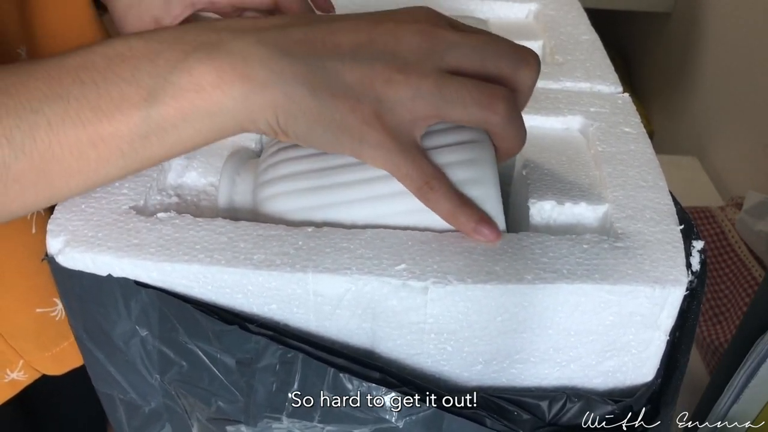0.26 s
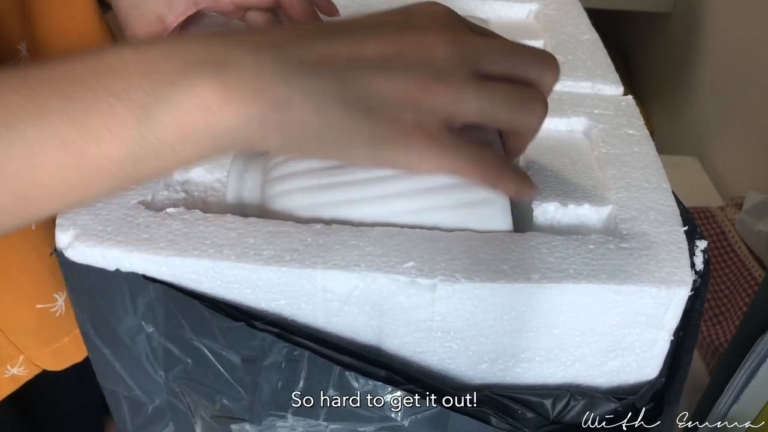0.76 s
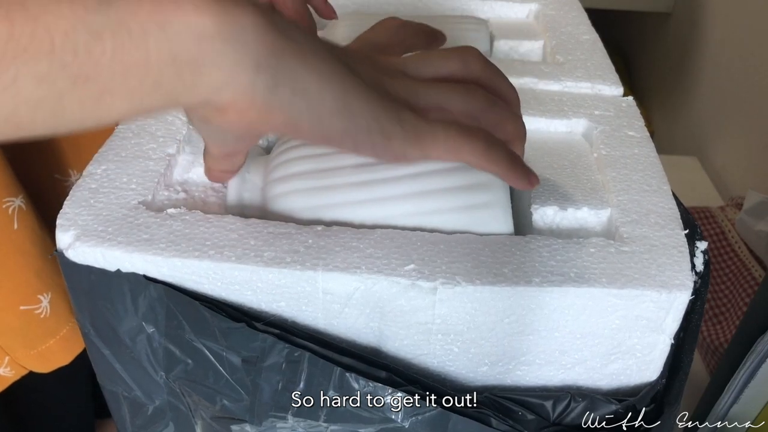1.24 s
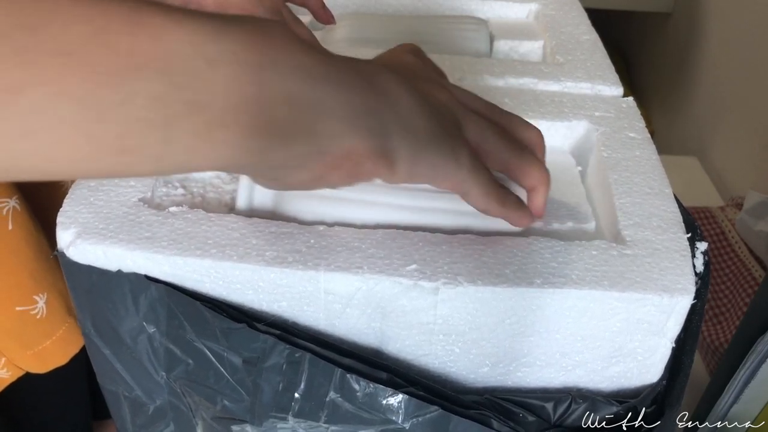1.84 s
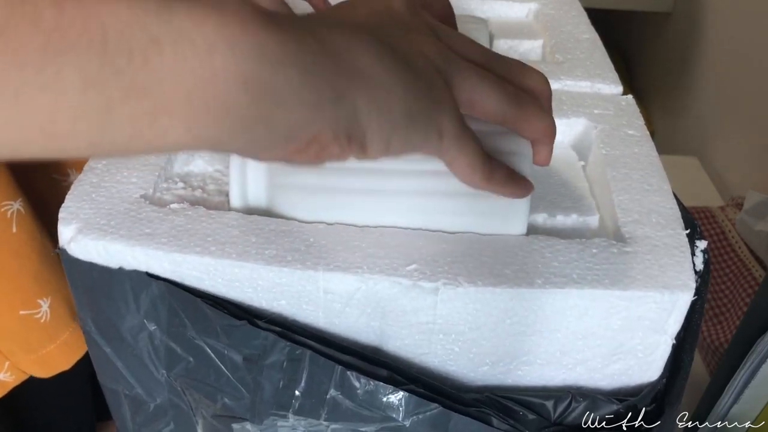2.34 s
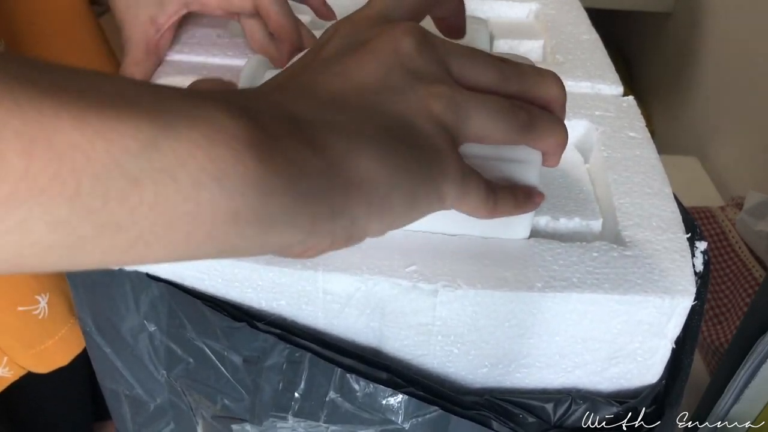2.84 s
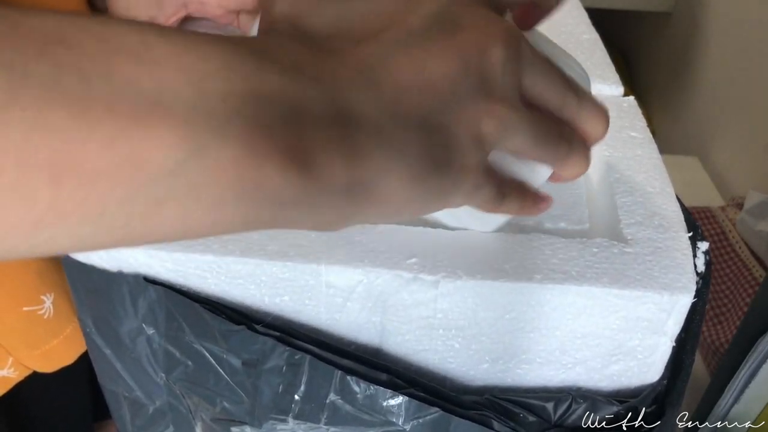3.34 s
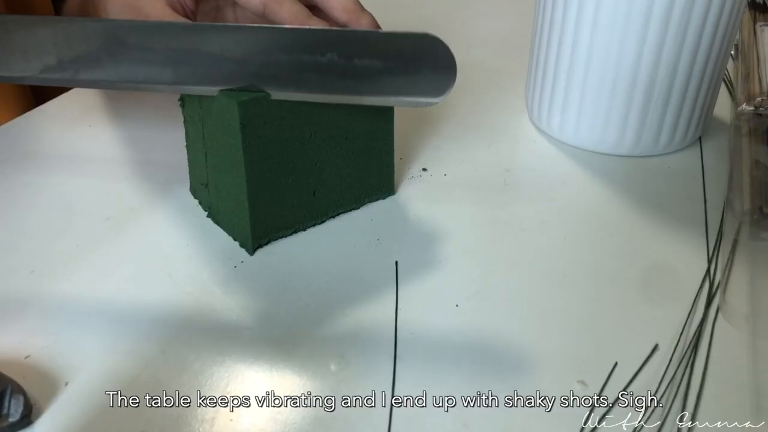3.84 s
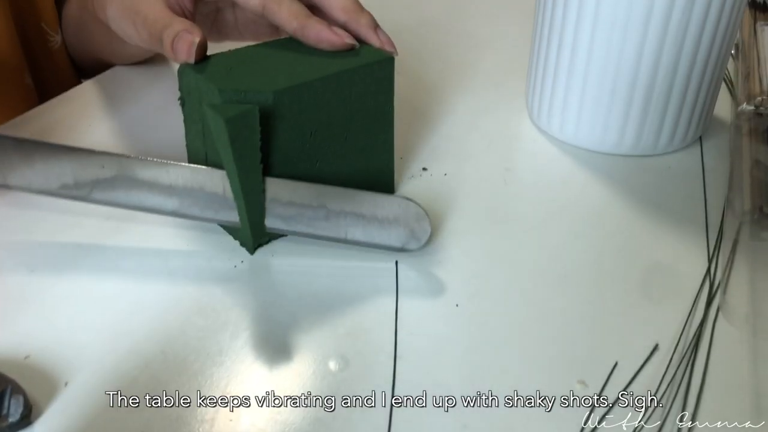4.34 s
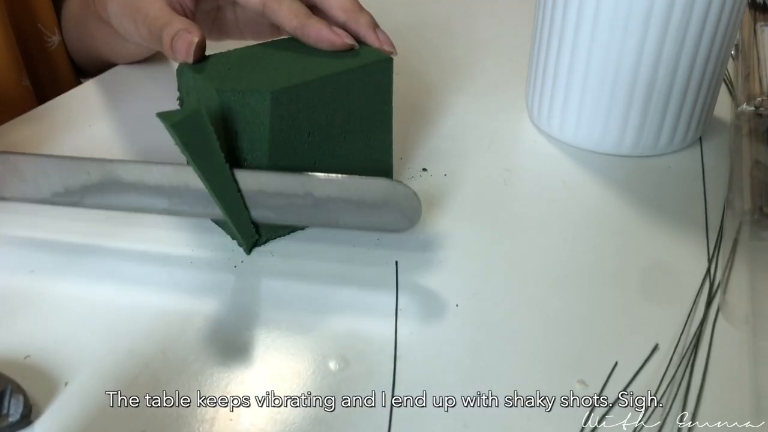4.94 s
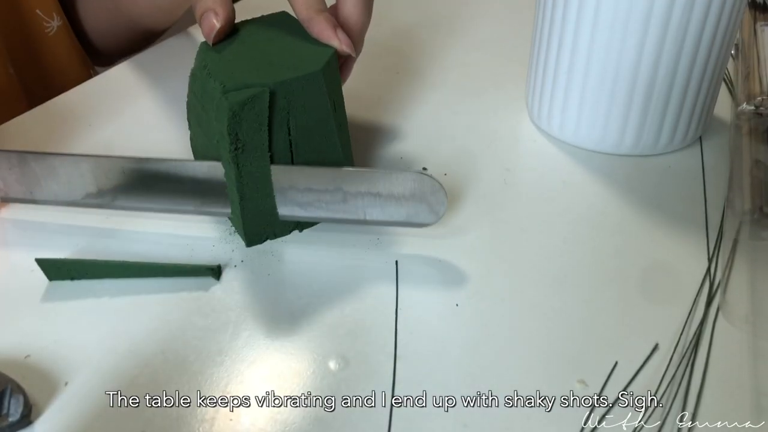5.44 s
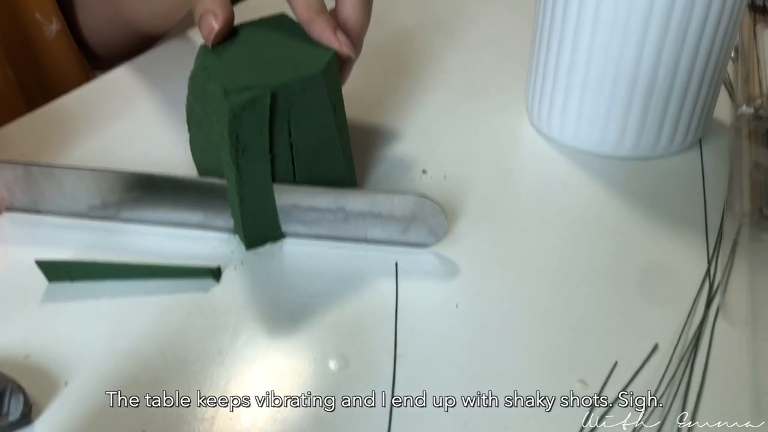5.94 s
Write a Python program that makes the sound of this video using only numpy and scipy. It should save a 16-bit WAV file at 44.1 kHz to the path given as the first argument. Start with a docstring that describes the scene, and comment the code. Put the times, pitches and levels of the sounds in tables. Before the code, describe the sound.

Close handheld microphone indoors. Dry polystyrene beads tick, crackle and rub in uneven tugs against a glazed vase, swelling into loud bright rasps and short squeals. The scene switches suddenly to a table with a wavering low hum, where a blade scrapes and squeaks into crisp foam, fizzes through it and clacks on the resonant top, with a soft falling piece before the final double clack.

```python
"""A ceramic vase is worked out of tight polystyrene packing over faint air: foam crackles, rubs, squeals hoarsely.
Slips are random grains in coloured bands, squeals gliding noise bands, snaps clicks with crunchy tails.
An abrupt change of scene leads to a knife in florist's foam over a low drone in a small room: scrapes, then
rasping breaking cells. The blade knocks on the table top three times, the last a double contact (clicks
into decaying modes); between the second and third a cut-off wedge lands with a soft pat."""
import sys
import numpy as np
from scipy import signal
from scipy.fft import rfft, irfft
from scipy.io import wavfile

SR = 44100
rng = np.random.default_rng(int(sys.argv[2]) if len(sys.argv) > 2 else 0)


def generate_wav(signal):
    """Clip the signal to [-1, 1] and save it as 16-bit WAV at the path in sys.argv[1]."""
    frames = np.transpose(np.atleast_2d(signal))
    scaled = np.clip(frames, -1, 1) * 32767
    pcm = np.round(scaled).astype(np.int16)
    wavfile.write(sys.argv[1], SR, pcm)


N = 272979
TIME = np.arange(N) / SR


def from_db(db):
    """Decibels to gain."""
    return 10 ** (np.asarray(db) / 20)


def rms_one(x):
    """Scale to unit power."""
    return x / np.sqrt(np.mean(x ** 2) + 1e-20)


def band(x, low_hz, high_hz, order=3):
    """Butterworth band-pass."""
    sos = signal.butter(order, [low_hz, high_hz], "band", fs=SR, output="sos")
    return signal.sosfilt(sos, x + 1e-18)


def drift(rate_hz):
    """Slow random wander of unit rms: noise through two equal poles, computed at SR / 20."""
    r = np.exp(-40 * np.pi * rate_hz / SR)
    noise = rng.standard_normal(N // 20 + 2002)
    slow = signal.lfilter([1], [1, -2 * r, r * r], noise)[2000:]   # drop the settling
    return np.interp(np.arange(N) / 20, np.arange(len(slow)), rms_one(slow))


def coloured(x, spectrum, size=8192):
    """Causal (minimum-phase) filter with the given spectrum shape and unit energy."""
    hz, db = np.transpose(spectrum)
    grid_hz = np.maximum(np.fft.rfftfreq(size, 1 / SR), 1)
    gain = from_db(np.interp(np.log(grid_hz), np.log(hz), db))
    cepstrum = irfft(np.log(gain))
    response = irfft(np.exp(rfft(2 * cepstrum[:size // 2], size)))
    return signal.fftconvolve(x, response / np.linalg.norm(response))[:N]


def ring(clicks, hz, t60_s):
    """A unit click sets a decaying sine of height 1 ringing."""
    r, w = from_db(-60 / (t60_s * SR)), 2 * np.pi * hz / SR
    return signal.lfilter([0, np.sin(w)], [1, -2 * r * np.cos(w), r * r], clicks + 1e-18)


def resonate(x, hz, width_hz):
    """Two-pole resonance with gain 1 on top."""
    r = np.exp(-np.pi * width_hz / SR)
    zeros = np.array([1, 0, -1]) * (1 - r * r) / 2
    return signal.lfilter(zeros, [1, -2 * r * np.cos(2 * np.pi * hz / SR), r * r], x)


def clicks_at(times_s, db):
    """One single-sample click for each contact."""
    out = np.zeros(N)
    out[np.round(np.asarray(times_s) * SR).astype(int)] = from_db(db)
    return out


def scatter(x, t60_s, rise_s):
    """Spread a sound into a dense, dying cloud of echoes of the same energy."""
    t = TIME[:SR // 2]
    cloud = rng.standard_normal(len(t)) * from_db(-60 * t / t60_s) * (1 - np.exp(-t / rise_s))
    return signal.fftconvolve(x, cloud / np.linalg.norm(cloud))[:N]


def grains(per_s, spread_db):
    """Tiny slips of uneven size at random moments; even power whatever their rate."""
    chance = np.clip(per_s / SR, 1e-4, 1)
    sizes = from_db(spread_db * np.minimum(rng.exponential(1, N), 4))
    signed = sizes * rng.choice([-1, 1], N)
    return rms_one(signed * (rng.random(N) < chance) / np.sqrt(chance))


def crunch(clicks, t60_s):
    """Every slip sheds a brief burst of noise of its own, with the slip's energy."""
    r = from_db(-120 / (t60_s * SR))   # decay of power
    power = signal.lfilter([1 - r], [1, -r], clicks ** 2 + 1e-18)
    return np.sqrt(power) * rng.standard_normal(N)


def wandering(x, depth, rate_hz, count=16):
    """The contact patch moves, so small resonances of the foam come and go."""
    centres_hz = np.geomspace(800, 11000, count)
    return x + depth * sum(drift(rate_hz) * resonate(x, hz, hz / 16) for hz in centres_hz)


def stroke(start_s, end_s, start_db, end_db, attack_s, release_s):
    """Gain of one movement: builds, slides with changing force, dies; attack and release span 20 dB."""
    outside = np.maximum(start_s - TIME, 0) / attack_s + np.maximum(TIME - end_s, 0) / release_s
    return from_db(np.interp(TIME, [start_s, end_s], [start_db, end_db]) - 20 * outside)


def together(strokes, resting_db, offsets_db=0):
    """Overlapping movements and the resting contact add in power."""
    gains = np.array(strokes).T * from_db(offsets_db)
    return np.sqrt(np.sum(gains ** 2, axis=1) + from_db(resting_db) ** 2)


def air():
    """Faint steady air by the packing: coloured noise."""
    # air spectrum shape: hz, relative_db
    air_colour = [(15, -46), (25, -8.5), (76, -2.5), (451, -26.5), (1040, -29), (1190, -27), (4250, -28),
                  (7510, -39), (10700, -42), (16000, -30)]
    return from_db(-59.5) * coloured(rng.standard_normal(N), air_colour)


def packing():
    """Beads stick and slip on the glaze: lone crackles when slow, a dense rasp when pulled hard."""
    # pulls and shifts of the vase: start_s, end_s, start_db, end_db, attack_s, release_s,
    # body_db (re rasp), hiss_db (re rasp, before its trim)
    pull_table = [(0.054, 0.125, -42.5, -44.5, 0.085, 0.076, -6.5, -3),
                  (.16, 0.266, -43, -51, 0.16, 0.2, -17.5, -4),
                  (0.308, 0.347, -50.5, -48.5, 0.091, 0.094, -13, -0.5),
                  (0.478, 0.567, -55, -58, .1, 0.051, -7.5, -1.5),
                  (0.619, 0.73, -49.5, -47, .03, 0.13, -8.5, -2),
                  (0.839, 0.852, -48, -51, 0.014, 0.04, -9, -1.5),
                  (1.068, 1.162, -64.5, -54.5, .02, 0.11, -4.5, -2),
                  (1.264, 1.399, -52.5, -48, 0.037, 0.062, -4, -2.5),
                  (1.197, 1.206, -47, -44, 0.029, 0.026, -6, -1),
                  (1.423, 1.523, -41, -49, 0.035, 0.13, -5, -1),
                  (1.591, 1.778, -27, -29, 0.12, 0.12, -11, -1),
                  (1.852, 1.93, -54.5, -54.5, 0.11, 0.053, 6, -23),
                  (2.075, 2.222, -25, -27.5, 0.31, 0.045, -13, -2.5),
                  (2.271, 2.345, -46, -61.5, 0.09, 0.04, 2.5, -21),
                  (2.477, 2.573, -33.5, -33.5, 0.15, 0.095, -6, -2.5),
                  (2.736, 2.731, -53.5, -54, 0.023, .09, 2, -8),
                  (2.816, 2.892, -41, -40, 0.029, 0.062, -2.5, -5),
                  (3.034, 3.142, -30, -31.5, 0.092, 0.074, -8, -4.5),
                  (3.184, 3.441, -31.5, -43, 0.18, 0.15, -10.5, -4),
                  (3.549, 3.575, -39, -39, 0.041, 0.13, -10.5, -1),
                  (3.655, 3.721, -42, -39, 0.089, 0.044, -6.5, -0.5)]
    # rubbed foam spectrum shape: hz, relative_db
    rub_colour = [(53, -53), (90, -46), (125, -12.5), (230, -8.5), (385, -6.5), (532, -11.5), (661, -5.5),
                  (769, -7), (896, -5), (1020, -4), (1290, -2.5), (1470, 0), (2900, -3.5), (6440, -0.5),
                  (11000, -11.5), (14400, -12), (16000, -19.5)]
    resting_db = -75   # the vase never lies quite still in the foam
    firm_slips_per_s, firm_pull_db = 3200, -40.5   # slip rate grows with the pull
    crackles_per_s, crackle_db, crackle_spread_db = 130, -10, 2   # coarser slips, dB re rasp

    pulls = [stroke(*row[:6]) for row in pull_table]
    body_db, hiss_db = np.transpose(pull_table)[6:]
    rasp_gain = together(pulls, resting_db)
    rasp_db = 20 * np.log10(rasp_gain)
    slips = grains(firm_slips_per_s * from_db(rasp_db - firm_pull_db), spread_db=1.5)
    # light contact moves in jerks, a firm pull slides more evenly
    jerk_db = np.clip(2.12 - 0.035 * (rasp_db + 60.5), 0, 4)
    slips = slips * from_db(jerk_db * drift(118) - jerk_db ** 2 / 9)   # last term evens mean power
    slips = slips + crunch(slips, t60_s=0.009) + from_db(-5) * crunch(slips, t60_s=0.05)
    foam = coloured(wandering(slips, depth=0.39, rate_hz=4.2), rub_colour)

    body = together(pulls, resting_db - 8, body_db) * rms_one(band(foam, 109, 977))
    hiss = together(pulls, resting_db + 4, hiss_db + 1.07) * rms_one(band(foam, 5630, 18800))
    coarse = crunch(grains(crackles_per_s, crackle_spread_db), t60_s=0.0093)
    crackle = from_db(crackle_db) * rms_one(band(coarse, 1200, 12000, order=1))
    rasp = from_db(0.5) * rms_one(band(foam, 1700, 5670, order=2))
    return body + rasp_gain * (rasp + crackle) + hiss


def squeals():
    """Gripping foam slips in a ragged rhythm for moments: a narrow noise band that glides."""
    # groans and squeals: start_s, end_s, start_hz, end_hz, width_hz, level_db
    squeal_table = [(0.009, 0.145, 295.4, 275.3, 176, -48), (1.236, 1.407, 789, 858, 249, -54.5),
                    (1.553, 1.822, 354, 375.6, 128, -43), (2.02, 2.258, 865, 935, 253, -34.5),
                    (2.055, 2.25, 5620, 5810, 910, -33.5), (3.028, 3.138, 1400, 1540, 160, -36),
                    (3.07, 3.151, 1965, 2330, 250, -36), (3.53, 3.61, 3720, 3680, 140, -40.5),
                    (3.54, 3.595, 5050, 5300, 250, -43), (3.524, 3.726, 2410, 2450, 120, -47),
                    (3.64, 3.734, 4380, 4600, 300, -46), (3.983, 4.014, 1830, 1940, 60, -30.5),
                    (4.022, 4.122, 1950, 2007, 90, -39.5)]
    out = np.zeros(N)
    for start_s, end_s, start_hz, end_hz, width_hz, db in squeal_table:
        pitch_hz = np.interp(TIME, [start_s, end_s], [start_hz, end_hz])
        phase = 2 * np.pi * np.cumsum(pitch_hz) / SR
        progress = np.clip((TIME - start_s) / (end_s - start_s), 0, 1)
        swell = np.sqrt(np.abs(np.sin(np.pi * progress)))
        ragged = drift(width_hz / 2) * np.cos(phase) + drift(width_hz / 2) * np.sin(phase)
        out += from_db(db) * swell * ragged
    return out


def snaps():
    """A bead lets go with a sharp tick and brief crunch; the box answers the loudest lower down."""
    # loudest beads snapping free, before the gains below: time_s, tick_db, body_db (re tick)
    snap_table = [(0.0429, -13, -15), (0.0631, -12.5, -28), (0.4976, -20, -37), (0.5496, -22.5, -40),
                  (0.6151, -23, -27), (0.657, -15.5, -18), (0.7605, -17.5, -35), (0.841, -23, -15),
                  (0.924, -38, -11), (0.9792, -38, -23), (1.058, -28.5, -16), (1.0894, -24.5, -31),
                  (1.1336, -24, -19), (1.1494, -27.5, -12), (1.186, -32, -11), (1.198, -21, -18),
                  (1.3787, -22, -27), (1.4282, -14, -24), (1.4848, -9.5, -25), (1.8734, -12.5, -15),
                  (2.351, -20.5, -13), (2.384, -27, -22), (2.7328, -29.5, -5.5), (2.808, -29, -22)]
    tick_gain_db, box_gain_db = 4, 23
    small_per_s, small_db, small_spread_db = 14, -49, 8   # levels before tick gain

    time_s, tick_db, body_db = np.transpose(snap_table)
    small_sizes = from_db(small_db + small_spread_db * rng.standard_normal(N))
    ticks = clicks_at(time_s, tick_db) + (rng.random(N) < small_per_s / SR) * small_sizes
    tails = from_db(3.5) * crunch(ticks, t60_s=0.0088) + crunch(ticks, t60_s=0.029)
    crack = band(tails, 1700, 6800, order=1)
    box = band(crunch(clicks_at(time_s, tick_db + body_db), t60_s=0.094), 240, 1760, order=2)
    return from_db(tick_gain_db) * crack + from_db(box_gain_db) * box


def drone():
    """Wavering low drone at the table: coloured noise plus noise through narrow resonances."""
    # drone spectrum shape: hz, relative_db
    drone_colour = [(18, -27), (30, -5.5), (64, 0.5), (100, -7), (149, -13), (199, -9), (266, -20.5),
                    (311, -22), (822, -34.5), (988, -29.5), (3140, -32.5), (3980, -46), (8740, -44.5),
                    (14400, -55), (16000, -57)]
    out = from_db(-56.5) * coloured(rng.standard_normal(N), drone_colour)
    for hz, width_hz, db in [(59.7, 7.2, -52), (129.7, 4.7, -67.5), (207.4, 8, -69)]:
        once = resonate(rng.standard_normal(N), hz, width_hz)
        out += from_db(db) * rms_one(resonate(once, hz, width_hz))
    return out


def slicing():
    """Countless brittle cells break under the blade; in the first stroke its chatter rings the block."""
    # blade pushes: start_s, end_s, start_db, end_db (before hiss gain), fizz_db (re push)
    cut_table = [(3.968, 4.053, -47.5, -44, -0.5), (4.058, 4.143, -43.5, -42, 7),
                 (4.45, 4.535, -72, -59.5, -5), (4.59, 4.655, -56, -44, 2.5),
                 (4.787, 4.85, -54.5, -56.5, -6), (5.085, 5.188, -70.5, -80, 7.5),
                 (5.196, 5.279, -60, -58.5, -2), (5.328, 5.391, -52, -51, -2),
                 (5.421, 5.457, -51, -51, -1.5), (5.71, 5.709, -54, -56, 0), (5.78, 5.828, -49, -42.5, 2),
                 (6.074, 6.085, -65, -63, -8)]
    # cut foam spectrum shape: hz, relative_db
    cut_colour = [(180, -37), (300, -6), (494, -2), (842, -3), (978, -11), (1250, -5), (1560, -14.5),
                  (2480, -3.5), (2880, -6), (3350, -2), (3950, -8), (6410, -7.5), (9390, -12), (14500, -21),
                  (16000, -31)]
    # block resonances: hz, width_hz, relative_db
    block_modes = [(630, 470, -23), (1160, 76, -1.5), (1795, 170, -1), (2550, 410, -6), (3490, 500, -5.5)]
    # short edge scrapes, before the mix gains: time_s, half_length_s, level_db
    scrape_table = [(3.774, 0.013, -43.5), (3.818, 0.007, -44.5), (3.857, 0.0075, -38.5),
                    (3.894, 0.01, -44.5), (3.919, 0.009, -51.5), (5.626, 0.0034, -54.5)]
    attack_s, release_s = 0.032, 0.035   # per 20 dB
    resting_db = -73.5   # the blade creeps between pushes; before hiss gain

    pushes = [stroke(*row[:4], attack_s, release_s) for row in cut_table]
    fizz_db = np.transpose(cut_table)[4]
    cells = grains(14000, spread_db=-3.5) * from_db(1.45 * drift(45))
    cells = cells + from_db(4) * crunch(cells, t60_s=0.0067)
    foam = coloured(wandering(cells, depth=0.63, rate_hz=9.1), cut_colour)
    hiss = from_db(3) * together(pushes, resting_db) * rms_one(band(foam, 300, 5700))
    fizz = together(pushes, resting_db - 3.5, fizz_db) * rms_one(band(foam, 6760, 19845))

    chatter = grains(3000, spread_db=-0.5)
    block = np.zeros(N)
    for k, (hz, width_hz, db) in enumerate(block_modes):
        block += (-1) ** k * from_db(db) * resonate(chatter, hz, width_hz)
    block = rms_one(block)
    # first bite into the block, until the blade reaches the table
    bite = stroke(start_s=3.963, end_s=4.115, start_db=-34, end_db=-37.5, attack_s=0.011, release_s=0.11)
    scrape_gain = sum(from_db(db) * np.exp(-((TIME - time_s) / half_s) ** 2 / 2)
                      for time_s, half_s, db in scrape_table)
    scrapes = scrape_gain * from_db(-5.5) * (block + rms_one(foam))
    return hiss + fizz + bite * block + scrapes


def knocks():
    """The steel clicks first; then the table gives under the blow, thumps and rings on."""
    # blade meeting the table, drive levels: time_s, click_db, thump_db, ring_db, thud_db, tone_hz
    knock_table = [(4.1536, -8, -9, -23.5, -21, 620), (4.6528, -9, -11, -23, -29, 507),
                   (5.8257, -19, -19, -56, -22.5, 1100), (5.8477, -15, -8.5, -29.5, -18, 810)]
    # blade modes: hz, relative_db, t60_s
    blade_modes = [(2370, -6, 0.002), (3550, -1.5, 0.0083), (4180, -1, 0.0024), (5900, -10, 0.0054),
                   (8100, -15, 0.006)]
    # table top modes: hz, relative_db, t60_s
    table_modes = [(130.9, -3.5, 0.35), (214.4, -4.5, 0.22), (307.2, 3.5, 0.12), (403, 0, 0.1),
                   (487.5, -1, 0.19), (580, -4.5, .15), (628, -3, 0.19), (702, 0, 0.15), (744, -9.5, 0.28),
                   (821, -4, 0.3), (930, -15.5, 0.35), (1062, -4, 0.16), (1100, -7, 0.28), (1162, 7, 0.088),
                   (1264, -6.5, 0.1), (1410, -9, .2), (1660, -4, 0.08)]
    table_delay_s = 0.00144

    time_s, click_db, thump_db, ring_db, thud_db, tone_hz = np.transpose(knock_table)
    steel = clicks_at(time_s, click_db)
    click = sum(from_db(db) * ring(steel, hz, t60_s) for hz, db, t60_s in blade_modes)
    pressed_s = time_s + table_delay_s
    push = clicks_at(pressed_s, thump_db)
    thump = band(ring(push, 398, 0.016) - from_db(-8) * ring(push, 780, 0.056), 160, 1600, order=1)
    thud = ring(clicks_at(pressed_s, thud_db), 119.3, 0.12)

    # each blow lands on a new spot and favours the modes near its own tone
    luck_db = 1.5 * rng.standard_normal((len(time_s), len(table_modes)))
    top = np.zeros(N)
    for k, (hz, db, t60_s) in enumerate(table_modes):
        strength_db = ring_db + db + luck_db[:, k] - 3 * np.abs(np.log2(hz / tone_hz))
        top += (-1) ** k * ring(clicks_at(pressed_s, strength_db), hz, t60_s)
    # the many weaker modes blur into a rattle
    rattle = 50 * band(crunch(clicks_at(pressed_s, ring_db), t60_s=0.35), 370, 1650, order=4)
    wood = band(thump + thud + top, 75, 5000, order=2)

    # the contact cracks, and its treble lingers in the room
    crack = band(crunch(clicks_at(time_s, click_db - 1.5), t60_s=0.0031), 3000, 12000, order=1)
    lingering = band(crunch(clicks_at(time_s, click_db + 3), t60_s=0.33), 2300, 5500, order=1)
    scattered = from_db(-12) * scatter(click, t60_s=0.035, rise_s=0.0026)
    return click + crack + lingering + wood + rattle + scattered


def falling_slice():
    """The cut-off wedge lands with a soft, dull pat: one low noise burst."""
    land_s = 5.075
    return from_db(-13) * band(crunch(clicks_at([land_s], 0), t60_s=0.37), 170, 640, order=2)


def scene():
    """First the unpacking, then the cutting, each in a small room."""
    change_s, crossfade_s = 3.738, 0.0041
    at_table = np.clip((TIME - change_s) / crossfade_s + 0.5, 0, 1)
    vase = packing() + snaps()
    vase_room = from_db(-10) * scatter(vase, t60_s=0.094, rise_s=0.0078)
    unpacking = vase + vase_room + air()
    knock = knocks()
    knock_room = from_db(-14.5) * scatter(knock, t60_s=0.35, rise_s=0.0062)
    cutting = slicing() + falling_slice() + knock + knock_room + drone()
    # squeals occur in both scenes
    return ((1 - at_table) * unpacking + at_table * cutting + squeals())[None]


def record(dry):
    """Peaks are rounded by tanh and the top is cut steeply by an elliptic low-pass."""
    ceiling, cutoff_hz = 0.55, 16100
    rounded = ceiling * np.tanh(dry / ceiling)
    low_pass = signal.ellip(12, 0.1, 80, cutoff_hz, fs=SR, output="sos")
    return signal.sosfilt(low_pass, rounded)


dry = scene()
out = record(dry)
generate_wav(out)
```